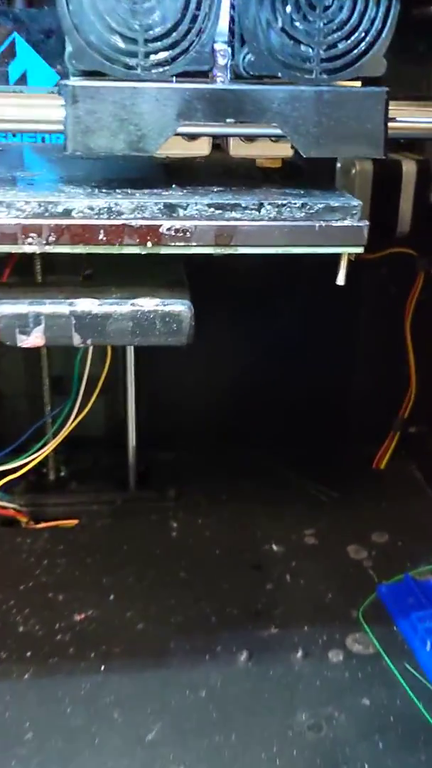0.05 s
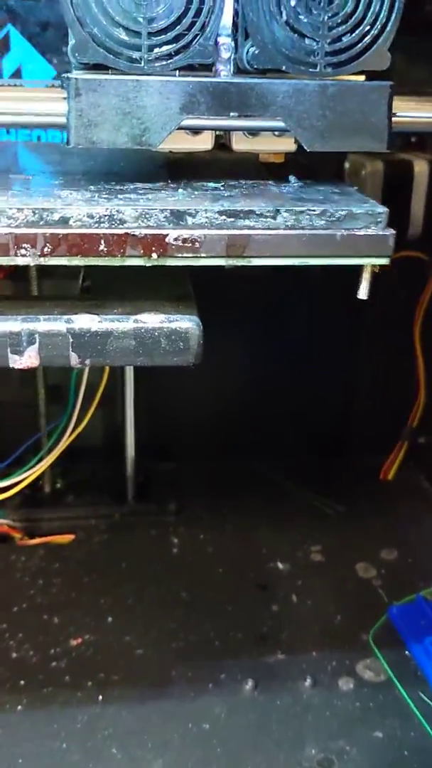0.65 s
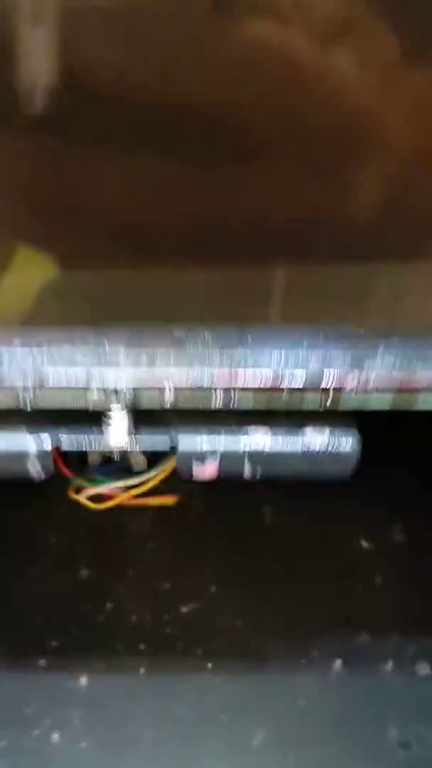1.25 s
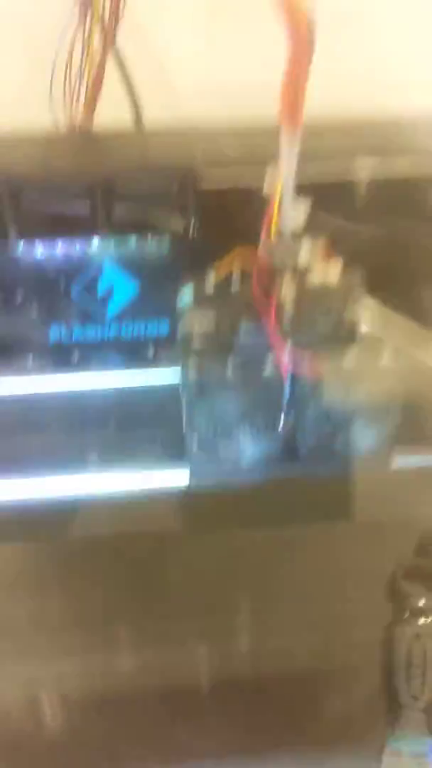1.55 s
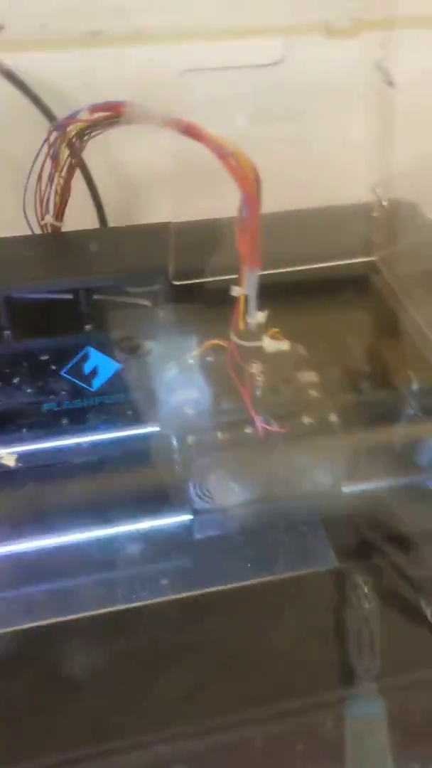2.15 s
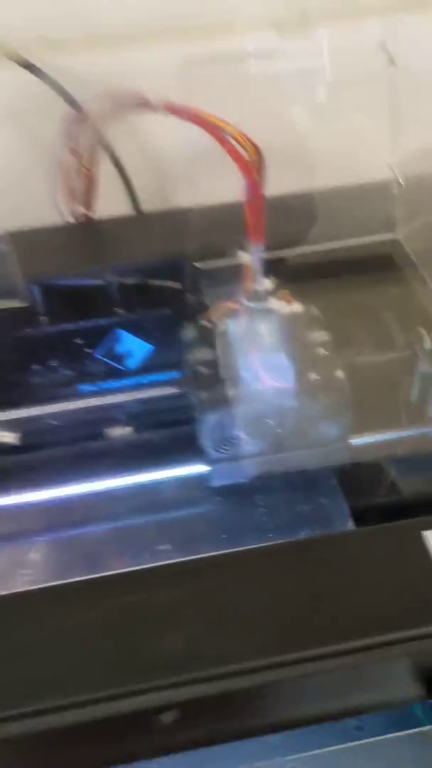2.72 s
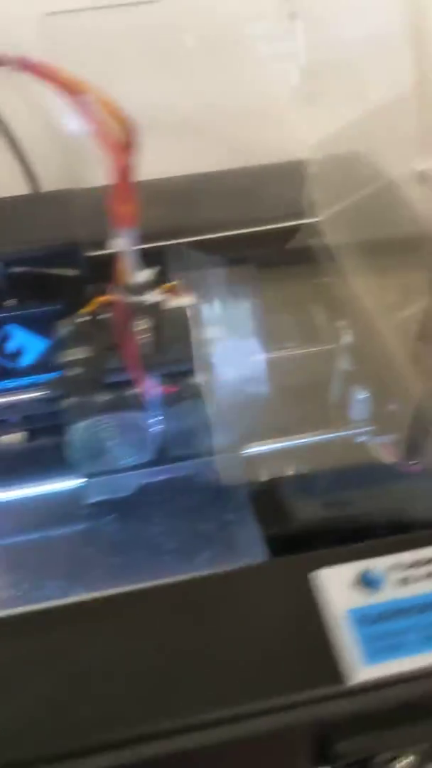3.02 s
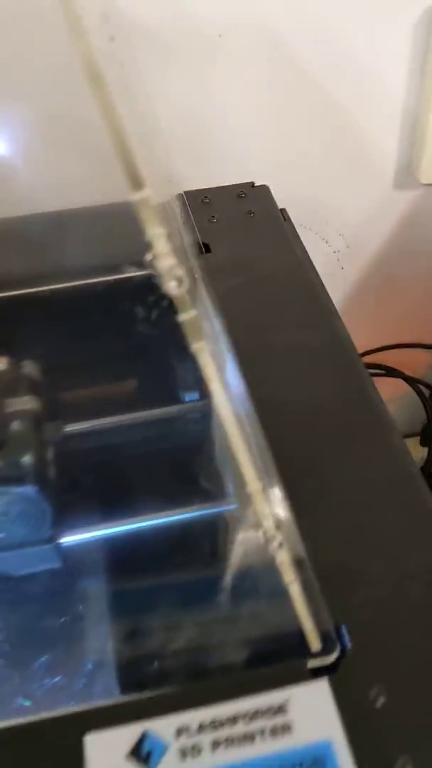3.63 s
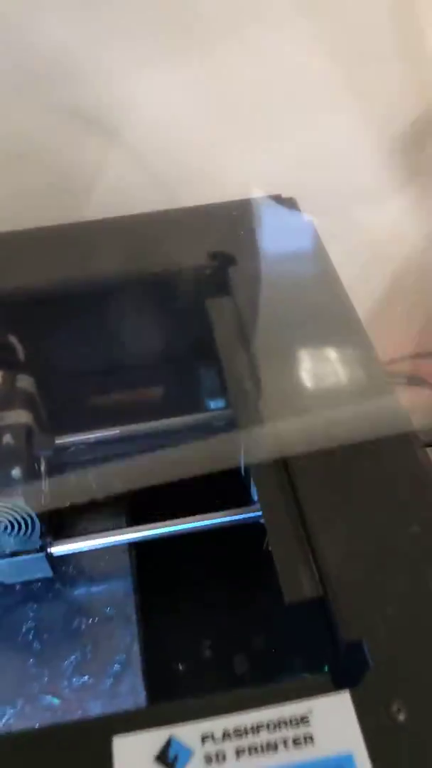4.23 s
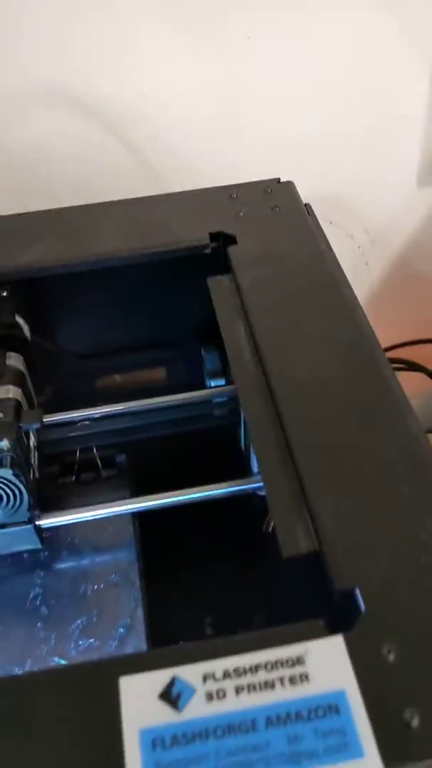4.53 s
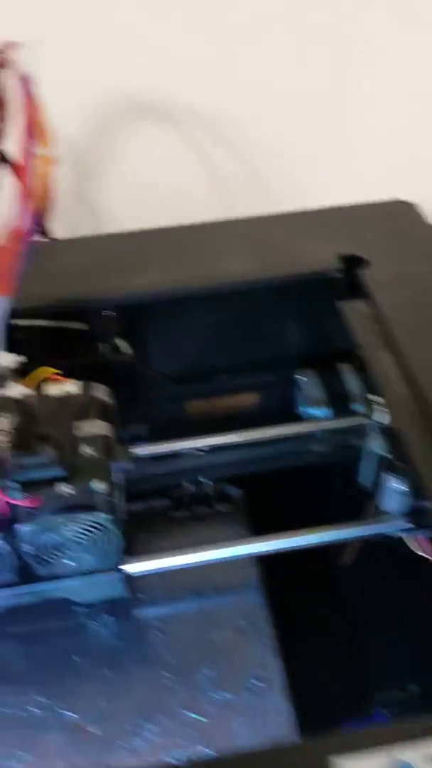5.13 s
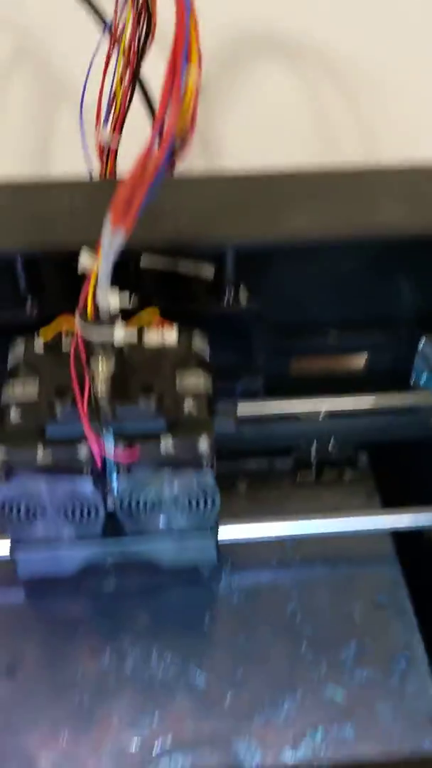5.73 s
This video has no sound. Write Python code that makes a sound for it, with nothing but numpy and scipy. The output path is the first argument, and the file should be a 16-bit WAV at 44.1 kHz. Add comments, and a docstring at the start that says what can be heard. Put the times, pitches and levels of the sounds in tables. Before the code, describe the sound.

A desktop 3D printer runs throughout, heard close up in a small room: fans give an airy rush and a thin, wavering whine, while motors hum and make the case rumble. A light tick comes at 0.5 seconds. At about 1.0 and 1.35 seconds the door clatters in two quick bursts, each with a hollow boom, followed by a faint squeak. The hiss softens as the microphone moves above the plastic lid. Light clacks come around 2.2 seconds, then fingers scuff and squeak briefly on the plastic from 2.6 to 3.0 seconds. After a small click, the lid comes loose with a loud, sharp clack and thump at 3.2 seconds, and the low motor hum grows stronger. A few more hollow knocks follow between 3.9 and 4.1 seconds as the lid is lifted off. The fans and motors then continue alone until nearly 6 seconds.

```python
"""The door and clear plastic lid of a running desktop 3D printer are handled in a small room.
At the open front the door clatters twice: impacts excite dense panel modes, and the lowest ones boom.
The microphone then moves above the lid, which is gripped with stick-slip squeaks, clacks loose and
is lifted off the fans. Throughout, the fans blow turbulent air and whine, while stepper motors hum
and drive the case into forced vibration."""
import sys
import numpy as np
from scipy import signal
from scipy.fft import rfft, irfft
from scipy.io import wavfile
from scipy.ndimage import uniform_filter1d

SR = 44100
rng = np.random.default_rng(int(sys.argv[2]) if len(sys.argv) > 2 else 0)


def file_out(sig):
    """Save sig as 16-bit WAV at sys.argv[1]."""
    # one column per channel
    cols = np.atleast_2d(sig).T
    # limit, then scale
    lim = np.clip(cols, -1, 1)
    pcm = np.round(lim * 32767).astype(np.int16)
    wavfile.write(sys.argv[1], SR, pcm)


N = 254456
TIME, FREQ = np.arange(N) / SR, np.fft.rfftfreq(N, 1 / SR)
CUTOFF_HZ = 15900

# edges of an impact's low, middle, bright and sizzle bands: f/Hz
BAND_EDGES = [130, 500, 1800, 5000, 17000]
# muffling by the lid: t/s, fraction (0-1)
LID_MUFFLING = [(1.1, 0.06), (1.7, 0.36), (3.6, 1), (4.4, 0.7)]
# response of the plastic lid: f/Hz, level/dB
LID_SPECTRUM = [(120, 20.5), (330, 16), (550, -3.5), (850, -2), (1100, -10), (1350, -2.5), (1900, -13.5),
                (2650, -12), (3350, -17.5), (4000, -16), (6300, -25.5), (7500, -21.5), (8800, -24),
                (12000, -19.5), (15500, -23.5)]


def amp(db):
    """Amplitude ratio of a level in decibels."""
    return 10 ** (np.asarray(db) / 20)


def unit(x):
    """Normalisation to rms 1."""
    return x / np.sqrt(np.mean(x ** 2) + 1e-20)


def at_freq(points, hz):
    """Interpolation on a logarithmic frequency axis."""
    f, value = np.transpose(points)
    return np.interp(np.log(hz + 1), np.log(f + 1), value)


def curves(rows):
    """Linear interpolation of each column of a time table at every sample."""
    times, *columns = np.transpose(rows)
    return [np.interp(TIME, times, column) for column in columns]


def add(mix, start, sound):
    """Superposition of a sound on the mix, from a start in seconds."""
    part = mix[:, round(start * SR):][:, :sound.shape[-1]]
    part += sound[..., :part.shape[1]]


def wander(rate_hz):
    """Random modulation: low-passed noise of rms 1."""
    return unit(irfft(rfft(rng.standard_normal(N)) / (1 + (FREQ / rate_hz) ** 4), N))


def band(hz, lo, hi):
    """Magnitude response of a steep band-pass."""
    return 1 / np.sqrt((1 + (lo / (hz + 1)) ** 10) * (1 + (hz / hi) ** 10))


def noise_spectra(size):
    """Spatial coherence: noise at two microphones is alike in the bass, unrelated in the treble."""
    coherence = [(60, 0.98), (140, 0.82), (290, 0.26), (640, 0.88), (1400, 0.19), (3100, 0.26),
                 (7000, 0.08), (15000, 0.05)]  # between the channels: f/Hz, correlation (0-1)
    balance = [(60, -5.5), (130, -3.5), (330, -0.5), (1300, -2), (2400, 0), (4400, -1), (15000, 0)]  # left minus right: f/Hz, level/dB
    hz = np.fft.rfftfreq(size, 1 / SR)
    left, independent = rfft(rng.standard_normal((2, size)))
    shared = np.clip(at_freq(coherence, hz), 0, .99)
    right = shared * left + np.sqrt(1 - shared ** 2) * independent
    return np.array([left, right]) * amp(np.outer([.5, -.5], at_freq(balance, hz)))


def noise(gain):
    """Spectrally shaped stereo noise; the mean of its channels has rms 1."""
    x = irfft(noise_spectra(N) * gain, N)
    return x / x.mean(0).std()


def tone(hz, drift, flutter_db=2, balance_db=-2, spread_rad=0.46):
    """Standing waves shift the level and phase of a wavering partial at each microphone."""
    phase = 2 * np.pi * np.cumsum(hz * (1 + drift * wander(13))) / SR
    sides = [np.sin(phase + spread_rad * wander(1.8)) * amp(flutter_db * wander(10.5)) for _ in range(2)]
    return np.sqrt(2) * unit(np.array(sides)) * amp(np.outer([.5, -.5], balance_db))


def fan_air(rush_db=-2, hiss_db=-1, flicker_db=.5):
    """Turbulence noise, filtered by housing resonances, changes colour as the microphone rises."""
    airflow = [(0.0, -41, -47), (0.42, -41, -47), (0.85, -41, -47), (1.25, -40.5, -47.5),
               (1.78, -45, -53.5), (3.61, -47.5, -55), (4.16, -45, -51), (4.69, -46, -47), (5.77, -45, -46)]  # along the microphone's path: t/s, rush level/dB, hiss level/dB
    front_spectrum = [(150, -34), (250, 23), (354, -2.5), (393, -4), (436, -3), (775, -8), (906, -8),
                      (971, -5), (1020, -8.5), (1610, -14), (2760, -6.5), (3010, -6.5), (8120, -13),
                      (12800, -15), (16000, -18)]  # air at the front: f/Hz, level/dB
    top_spectrum = [(150, -28), (250, 23), (468, 2), (761, 0.5), (890, 4), (938, 1.5), (1120, 3), (1350, 2),
                    (1790, -4), (2490, -10.5), (3340, -20.5), (4050, -14.5), (8700, -27), (13000, -17.5),
                    (16000, -28)]  # air above the case: f/Hz, level/dB
    resonances = [(771.3, 60, 12), (1372, 260, 9), (2570, 490, 1.5), (3965, 260, 8), (4370, 57, 11),
                  (5540, 240, 6.5), (9450, 230, 6.5), (12320, 1060, 10.5), (13400, 490, 8.5)]  # fan housings: f/Hz, bandwidth/Hz, gain/dB
    peaks = sum(db / (1 + (2 * (FREQ - hz) / width) ** 2) for hz, width, db in resonances)
    above = np.interp(TIME, [1.1, 3.8], [0, 1])
    muffled, = curves(LID_MUFFLING)
    front, top = at_freq(front_spectrum, FREQ), at_freq(top_spectrum, FREQ)
    rush, hiss = curves(airflow)
    colours = front + peaks, top + peaks, (front + top) / 2
    power_shares = (1 - above) * (1 - muffled), above * (1 - muffled), muffled
    out = np.zeros((2, N))
    for colour, share in zip(colours, power_shares):
        out += np.sqrt(share) * amp(rush + rush_db) * noise(amp(colour) * band(FREQ, 375, 2540))
        out += np.sqrt(share) * amp(hiss + hiss_db) * noise(amp(colour) * band(FREQ, 2070, 19500))
    return out * amp(flicker_db * wander(37))


def fan_and_motor_tones(lid_db=-11.5):
    """Rotation radiates blade tones and, at the open front, low stepper hum and a high motor whine."""
    blade_pitch = [(0, 961), (1, 962), (1.5, 966), (2.3, 964), (4.7, 964), (5.3, 969), (5.77, 965)]  # loudest fan: t/s, f/Hz
    blade_level = [(0, -57), (0.28, -47.5), (0.62, -49.2), (0.82, -64), (1.07, -49.5), (1.45, -45.5),
                   (2.0, -60.5), (2.26, -54.4), (2.55, -58.5), (3.1, -57), (3.35, -54), (3.68, -61),
                   (4.35, -51), (4.66, -58.5), (5.03, -51), (5.25, -56), (5.45, -50.5), (5.77, -52)]  # its tone as the microphone crosses standing waves: t/s, level/dB
    blade_balance = [(0, -2), (.35, -10), (1.25, -13.5), (1.7, 4.5), (5.77, -1)]  # left minus right: t/s, level/dB
    hum_and_whine_partials = [(2823, -3.5), (2263, -11), (1904, -13), (218.5, -4.5), (173.6, -1),
                              (134.8, 4)]  # low stepper hum, high motor whine: f/Hz, level/dB
    hum_and_whine_level = [(0, -51), (.9, -50), (1.15, -47.5), (1.9, -55), (5.77, -56.5)]  # passing the open front and leaving it: t/s, level/dB
    weak_tones = [(259, -63), (302, -61.5), (531, -65), (778, -69.5), (1050, -62), (5631, -80)]  # other fans: f/Hz, level/dB
    pitch, level, balance = curves(blade_pitch) + curves(blade_level) + curves(blade_balance)
    blades = amp(level) * tone(pitch, drift=0.00064, flutter_db=3, balance_db=balance, spread_rad=0.14)
    hum_and_whine = sum(amp(db) * tone(hz, drift=0.00073, flutter_db=-0.5, balance_db=2, spread_rad=0.58)
                        for hz, db in hum_and_whine_partials)
    hum_and_whine *= amp(curves(hum_and_whine_level)[0] + lid_db * curves(LID_MUFFLING)[0])
    others = sum(amp(db) * tone(hz, drift=0.00326, flutter_db=5.5) for hz, db in weak_tones)
    return blades + hum_and_whine + others


def steppers(turn_hz=30.33, travel_hz=352, shake_db=-1, steadiness=.9, surge_db=2):
    """Forced vibration: a slow motor hums and shakes the case; a travelling one drones above it."""
    harmonics = [(2, -4), (3, -5.5), (4, -11), (5, -29)]  # slow motor: multiple of the turning rate, level/dB
    hum_level = [(0, -62.5), (3.1, -51.5), (3.35, -33), (3.9, -33.5), (4.4, -36.5), (5.77, -31)]  # slow motor: t/s, level/dB
    shake_spectrum = [(13, -43), (22, -17), (40, 4), (64, 6.5), (112, -2.5), (141, 0), (198, -16.5),
                      (297, -18.5), (324, -20.5), (350, -26.5), (382, -23), (450, -30.5), (580, -74),
                      (990, -120)]  # case vibration: f/Hz, level/dB
    shake_level = [(0, -31.5), (0.2, -37.8), (0.34, -28.5), (0.8, -30.5), (1.65, -28), (2.15, -31),
                   (3.1, -29), (3.42, -30), (5.77, -33)]  # case vibration: t/s, level/dB
    drone_level = [(0, -52.5), (.8, -52), (1.5, -52), (2.1, -58.5), (2.7, -49.5), (2.95, -51), (3.1, -60),
                   (5.77, -65)]  # travelling motor: t/s, level/dB
    hum = sum(amp(db) * tone(k * turn_hz, drift=0.021, flutter_db=-1.5, balance_db=-3.5, spread_rad=0.43)
              for k, db in harmonics)
    shake = noise(amp(at_freq(shake_spectrum, FREQ)) * band(FREQ, 46.4, 360))
    # a motor drives the panels evenly, so their swells stay small
    swell = np.sqrt(uniform_filter1d(shake.mean(0) ** 2, size=4000) + 1e-6)
    shake /= swell ** steadiness
    shake *= amp(curves(shake_level)[0] + shake_db + surge_db * wander(2.9))
    drone = amp(curves(drone_level)[0]) * tone(travel_hz, drift=0.0033, flutter_db=2.5)
    return amp(curves(hum_level)[0]) * hum + shake + drone


def finger_rub(grain_db=3, rustle_db=4):
    """Sliding friction of skin on plastic gives a grainy scuff with a thin rustle on top."""
    rub_level = [(2.57, -88), (2.63, -48.5), (2.72, -63), (2.79, -42.5), (2.84, -56), (2.97, -67),
                 (3.03, -90)]  # fingers sliding before they grip: t/s, level/dB
    colour_db = at_freq(LID_SPECTRUM, FREQ) + rustle_db * band(FREQ, 11500, 15000)
    scuff = noise(amp(colour_db) * band(FREQ, 440, 15000))
    return amp(curves(rub_level)[0]) * scuff * unit(amp(grain_db * wander(400)))


def finger_squeaks(rasp_db=3.5):
    """Stick-slip oscillation of fingers on the lid gives short, rough tones."""
    squeaks = [(2.766, 0.037, 652, -49), (2.848, 0.1, 2310, -55.5), (2.878, 0.077, 298, -42.5),
               (2.936, 0.07, 547, -47.5), (2.953, 0.054, 318, -42), (1.448, 0.1, 697, -48)]  # slips: t/s, duration/s, f/Hz, level/dB
    out = np.zeros((2, N))
    roughness = unit(amp(rasp_db * wander(78)))
    for start, duration, hz, db in squeaks:
        grip = signal.windows.tukey(round(duration * SR), .7)
        squeak = roughness * tone(hz, drift=0.0164)
        add(out, start, amp(db) * grip * squeak[:, :len(grip)])
    return out


def band_levels(db, tilt, spot_hz, weights_db, spot_db=5):
    """Excitation per band: hard contact favours the treble, the struck spot its own resonance."""
    octaves = np.log2(np.multiply(BAND_EDGES[:-1], BAND_EDGES[1:])) / 2
    favoured = np.exp(-(octaves - np.log2(spot_hz)) ** 2)
    return db + np.array(weights_db) + tilt * (octaves - octaves.mean()) + spot_db * favoured


def impact(spectrum, levels, t60, spot_hz, spot_db, ring_db, rise_cycles, hard_db, lag_s=0, spot_q=9):
    """Free decay of dense modes: a panel cracks, the case rings; low bands build up more slowly."""
    case_decay = [(200, 0.72), (700, 0.33), (2500, 0.25), (6000, 0.18), (14000, 0.12)]  # ring of the case: f/Hz, T60/s
    size = 16384
    t, hz = np.arange(size) / SR, np.fft.rfftfreq(size, 1 / SR)
    resonance_db = spot_db / (1 + (2 * spot_q * (hz / spot_hz - 1)) ** 2)
    # gentler contacts last longer and lose the top of the treble
    contact_db = 0.6 * (levels[-1] + hard_db) * (hz / CUTOFF_HZ) ** 2
    right_delay = np.exp(-2j * np.pi * np.outer([0, lag_s], hz))
    gain = amp(at_freq(spectrum, hz) + resonance_db + contact_db) * right_delay
    out = np.zeros((2, size))
    for lo, hi, db in zip(BAND_EDGES, BAND_EDGES[1:], levels):
        centre = np.sqrt(lo * hi)
        modes = irfft(noise_spectra(size) * gain * band(hz, lo, hi), size)
        crack = amp(-60 * t / t60 * (centre / 2000) ** 0.36)  # damping grows with frequency
        ring = amp(ring_db - 60 * t / at_freq(case_decay, centre))
        envelope = np.hypot(crack, ring) * (1 - np.exp(-t * centre / rise_cycles))
        envelope /= envelope.max()
        out += amp(db) * unit(modes * envelope) * np.sqrt(np.mean(envelope ** 2))
    return out


def boom(modes, shoves):
    """A shoved panel's low bending modes swell and decay, out of phase at the two microphones."""
    out, t = np.zeros((2, N)), np.arange(SR // 2) / SR
    side, lowest_hz = np.array([[.5], [-.5]]), modes[0][0]
    for start, db, tilt, balance_db in shoves:
        for hz, mode_db, rise, lead in modes:
            swing = (t / rise * np.exp(1 - t / rise)) ** 2
            level = db + mode_db + tilt * np.log2(hz / lowest_hz) + side * balance_db
            add(out, start, amp(level) * swing * np.sin(2 * np.pi * hz * t + side * lead))
    return out


def lid(clack_db=3):
    """Impact excitation: the stiff plastic lid clacks against the case and booms."""
    # contacts: t/s, level/dB, tilt/(dB/octave), T60/s of the crack at 2 kHz, spot resonance f/Hz
    clacks = [(0.532, -42, -1.4, 0.14, 2650), (2.150, -47, -2, 0.15, 1343), (2.166, -38.5, 1, 0.066, 1260),
              (2.306, -42, 1.5, 0.018, 9300), (2.311, -37.5, -2.5, 0.024, 690),
              (3.049, -36, 2, 0.045, 2490), (3.230, -27, 2.5, .024, 5400), (3.233, -19, 1.5, 0.015, 5600),
              (3.241, -33.5, -4, 0.058, 370), (3.945, -38, 2, 0.082, 2970), (4.066, -45, -2, 0.044, 1010),
              (4.078, -40, 0, 0.21, 1040), (4.121, -31.5, -0.3, 0.062, 890), (4.123, -30, 1.2, 0.044, 2400)]
    weights = [0, 0, 0, 0]  # impact bands, low to high: level/dB
    modes = [(72, 1, 0.023, -2), (175.8, -1.5, .0125, 0.2), (313, -11, 0.0041, -1)]  # panel: f/Hz, level/dB, time to peak/s, left phase lead/rad
    shoves = [(3.235, -18, 1, -11), (3.947, -22.5, 3, 0), (4.082, -27.5, 1, -8)]  # on the panel: t/s, level/dB, tilt/(dB/octave), left minus right/dB
    out = np.zeros((2, N))
    for start, db, tilt, t60, hz in clacks:
        clack = impact(LID_SPECTRUM, band_levels(db, tilt, hz, weights), t60, hz, spot_db=7.5,
                       ring_db=-20, rise_cycles=0.46, hard_db=16.5, lag_s=0.000082)
        add(out, start, clack)
    return amp(clack_db) * out + boom(modes, shoves)


def door(clatter_db=2, t60=0.13):
    """Contact chatter: the door strikes its frame in two quick runs of blows, and its panel booms."""
    blows = [(.969, -25.5, -2, 2500), (.974, -32, 2.5, 1380), (.985, -26.5, -1, 2524), (.999, -32, 1, 930),
             (1.317, -40, 5, 2670), (1.323, -28, -0.5, 790), (1.336, -36.5, -4, 1350),
             (1.353, -33, -0.5, 760)]  # contacts: t/s, level/dB, tilt/(dB/octave), spot resonance f/Hz
    spectrum = [(71, -26), (120, 11), (150, -13), (327, -8), (393, -16.5), (727, -13), (805, -9),
                (1090, -15.5), (1370, -11.5), (1620, -18.5), (2110, -9), (2530, -4.5), (5080, -12),
                (9790, -4.5), (16000, -12)]  # response of the door: f/Hz, level/dB
    weights = [-2, -2.5, 2.5, -9.5]  # impact bands, low to high: level/dB
    modes = [(91, -2, 0.033, 0.7), (205, -10, 0.0092, 0)]  # panel: f/Hz, level/dB, time to peak/s, left phase lead/rad
    shoves = [(.976, -18, 7.5, -3), (1.024, -13.5, 0.5, -6), (1.089, -28.5, -0.5, -18),
              (1.355, -7.5, -10, -.5)]  # on the panel: t/s, level/dB, tilt/(dB/octave), left minus right/dB
    out = np.zeros((2, N))
    for start, db, tilt, hz in blows:
        blow = impact(spectrum, band_levels(db, tilt, hz, weights), t60, hz, spot_db=5,
                      ring_db=-32, rise_cycles=0.65, hard_db=12)
        add(out, start, blow)
    return amp(clatter_db) * out + boom(modes, shoves)


def scene():
    """Superposition of the running printer and the handling of its door and lid."""
    return fan_air() + fan_and_motor_tones() + steppers() + door() + finger_rub() + lid() + finger_squeaks()


def record(dry):
    """Clipping at full scale, then low-pass filtering."""
    low_pass = signal.firwin(511, CUTOFF_HZ, window=("kaiser", 9), fs=SR)
    return signal.oaconvolve(np.clip(dry, -1, 1), low_pass[None], "same")


dry = scene()
out = record(dry)
file_out(out)
```